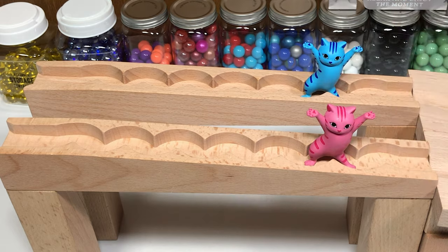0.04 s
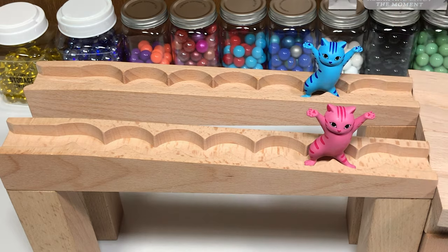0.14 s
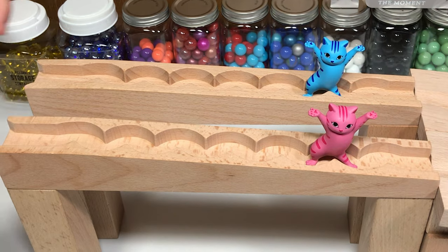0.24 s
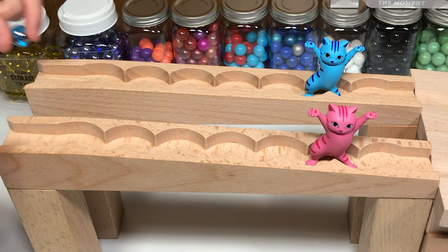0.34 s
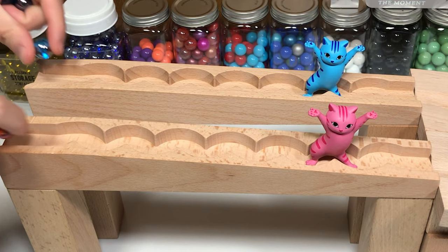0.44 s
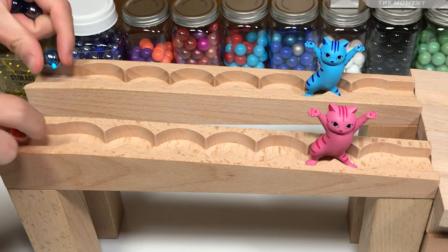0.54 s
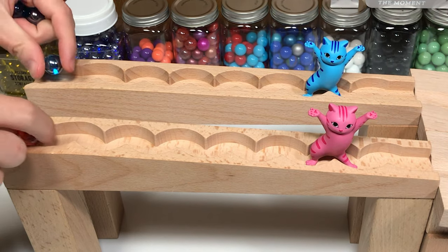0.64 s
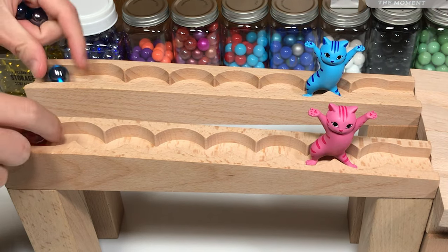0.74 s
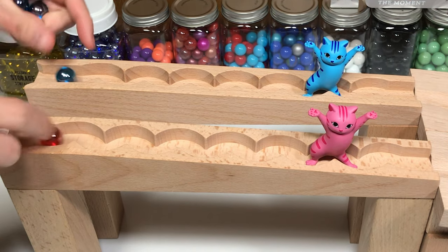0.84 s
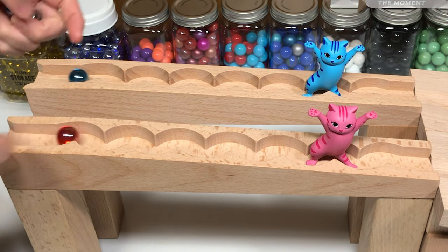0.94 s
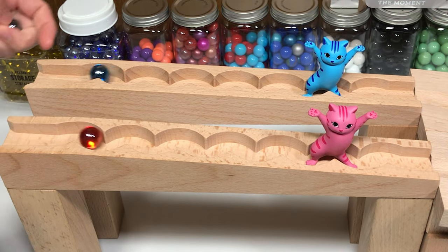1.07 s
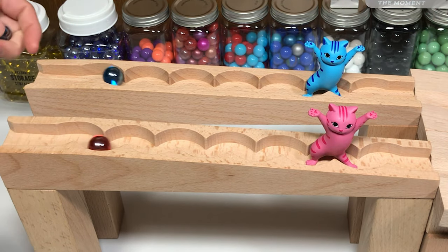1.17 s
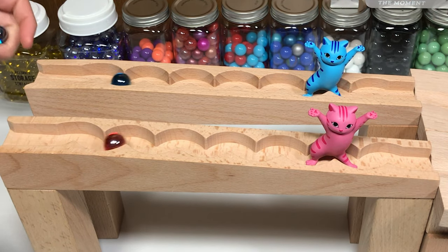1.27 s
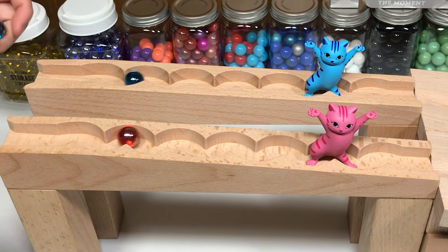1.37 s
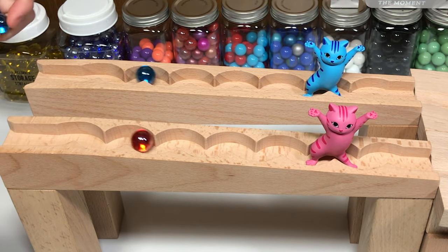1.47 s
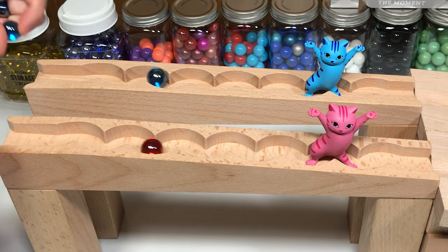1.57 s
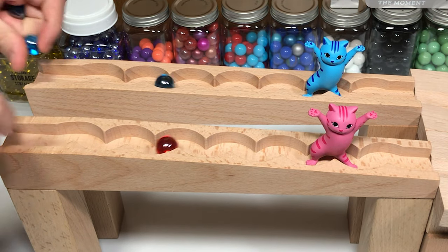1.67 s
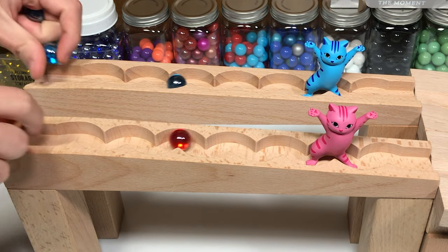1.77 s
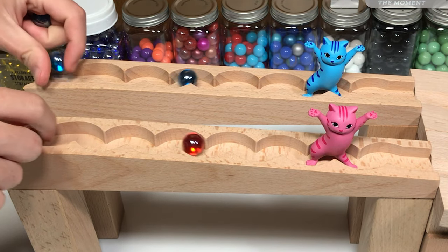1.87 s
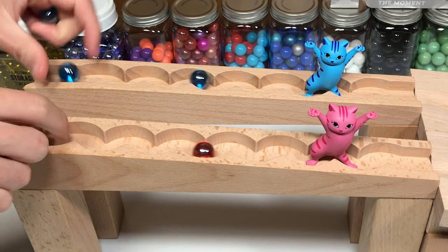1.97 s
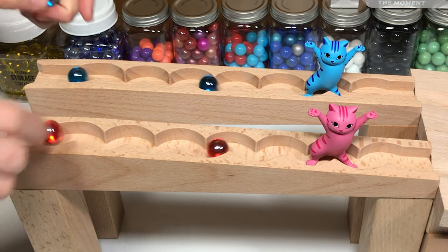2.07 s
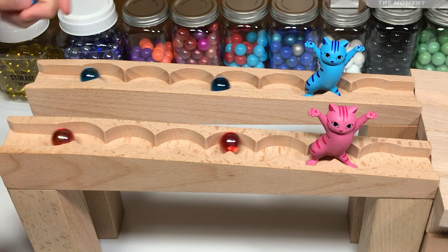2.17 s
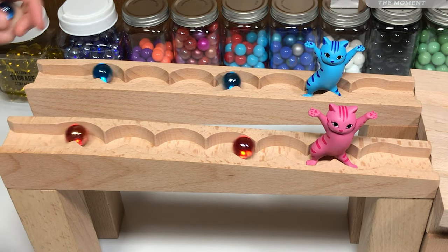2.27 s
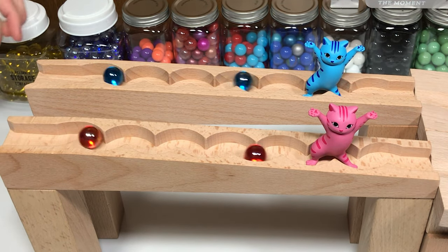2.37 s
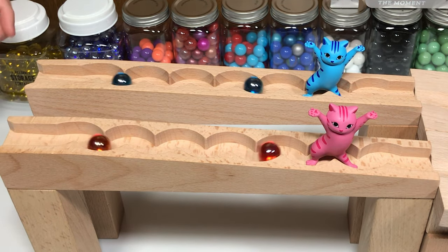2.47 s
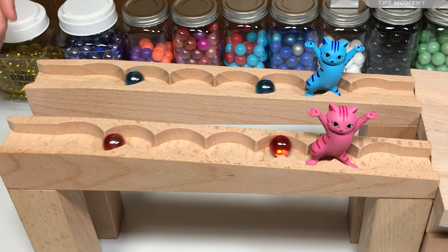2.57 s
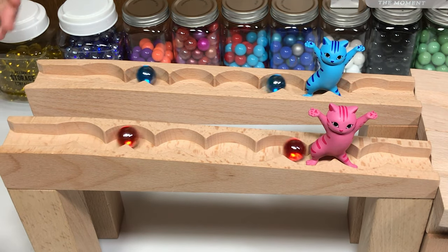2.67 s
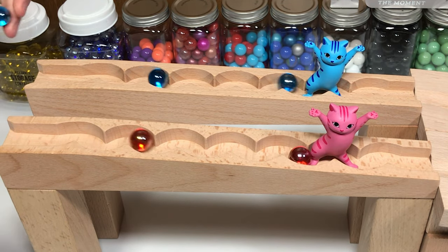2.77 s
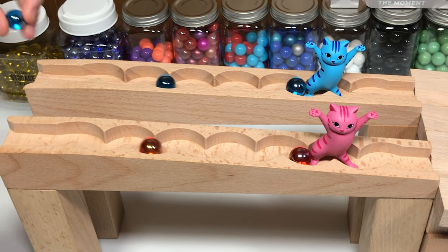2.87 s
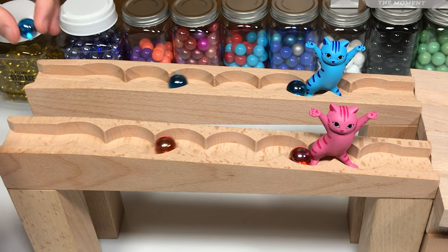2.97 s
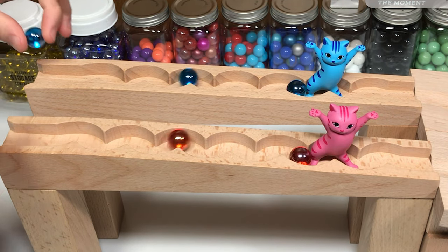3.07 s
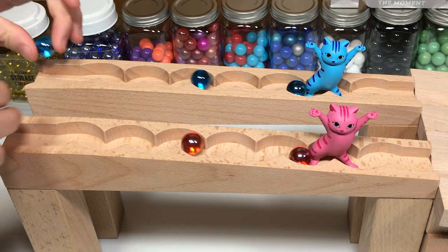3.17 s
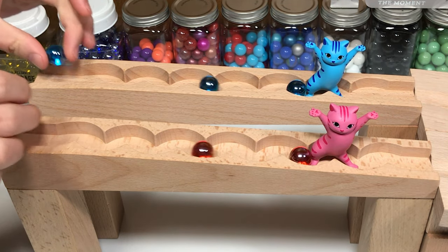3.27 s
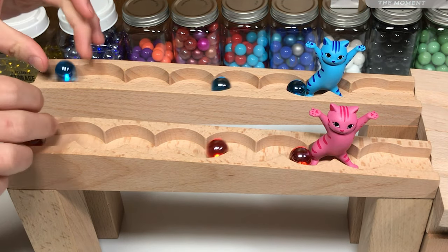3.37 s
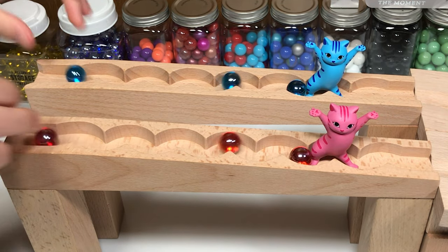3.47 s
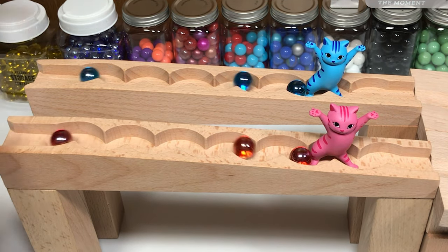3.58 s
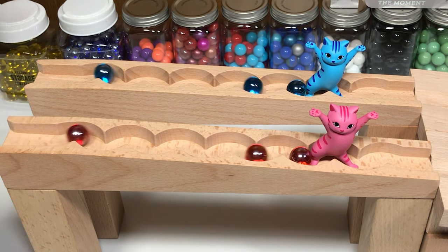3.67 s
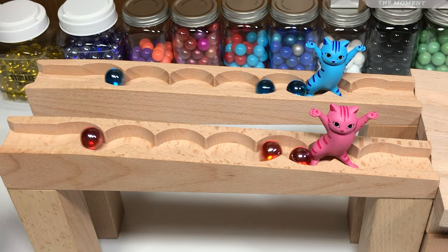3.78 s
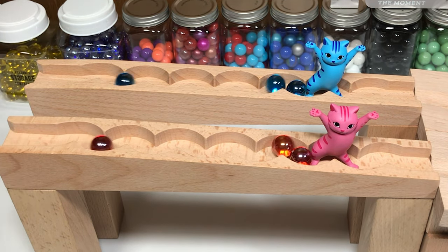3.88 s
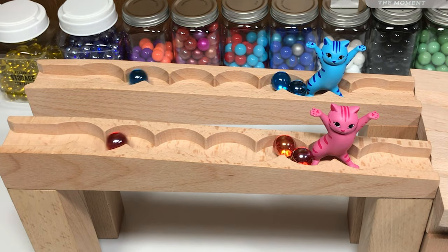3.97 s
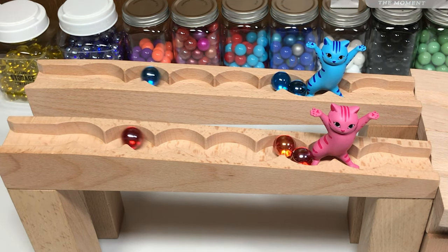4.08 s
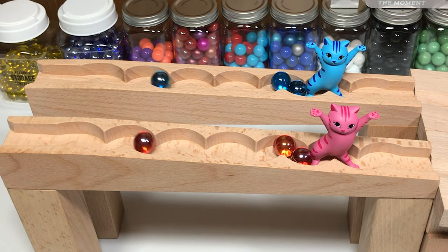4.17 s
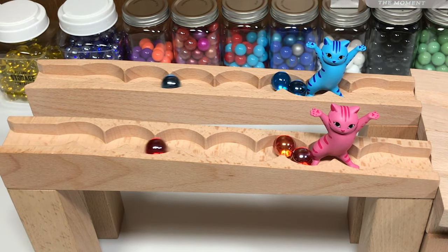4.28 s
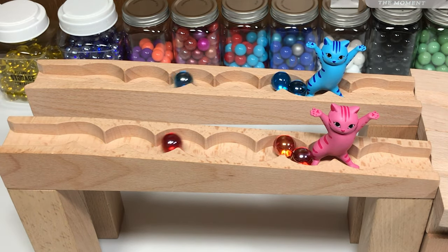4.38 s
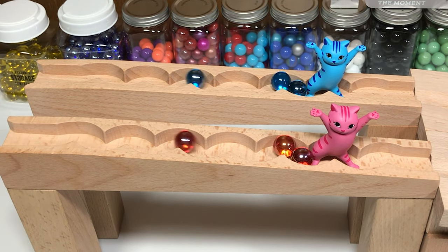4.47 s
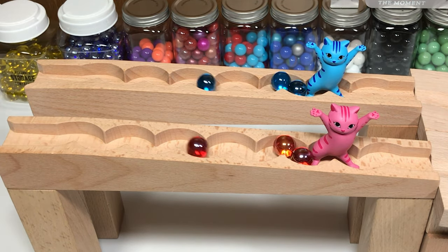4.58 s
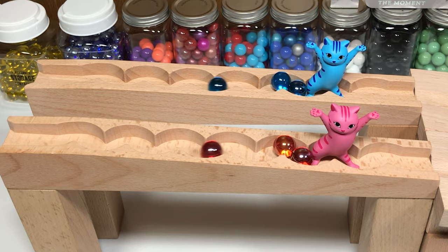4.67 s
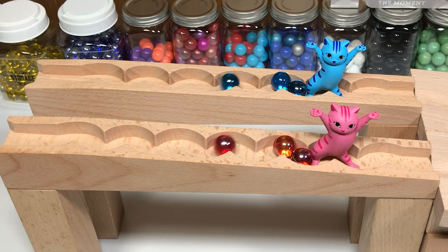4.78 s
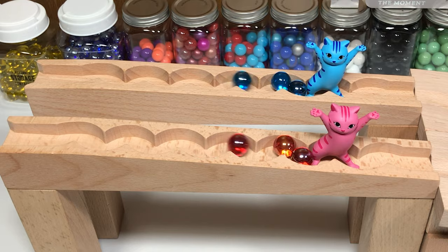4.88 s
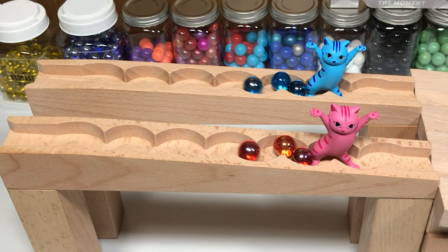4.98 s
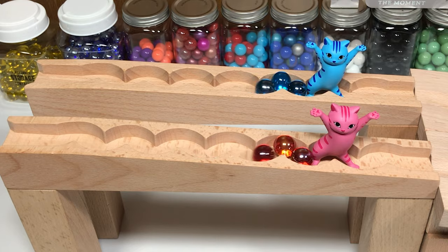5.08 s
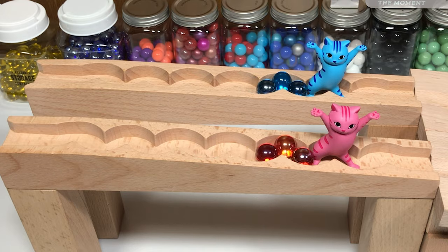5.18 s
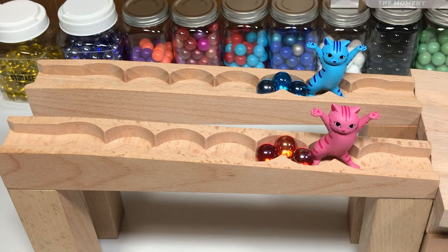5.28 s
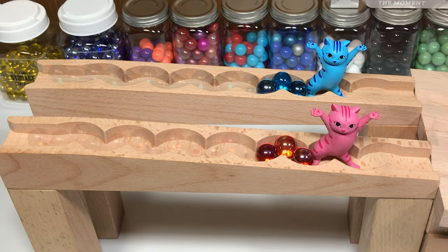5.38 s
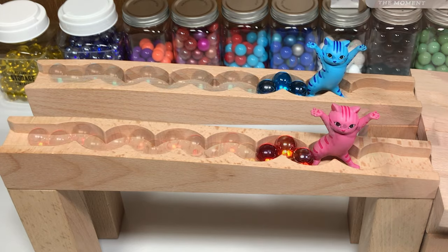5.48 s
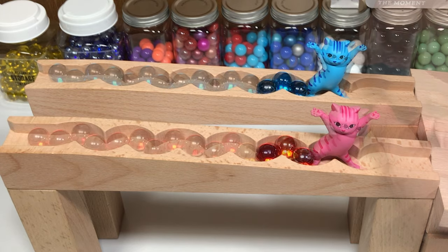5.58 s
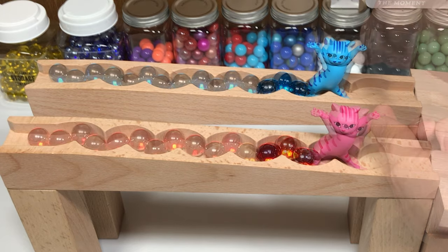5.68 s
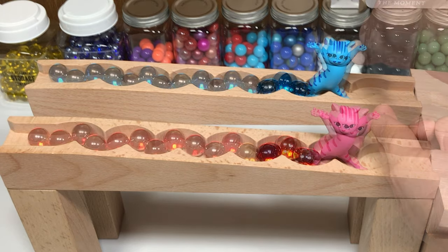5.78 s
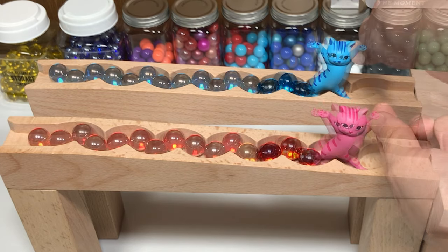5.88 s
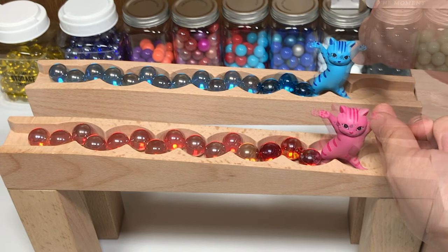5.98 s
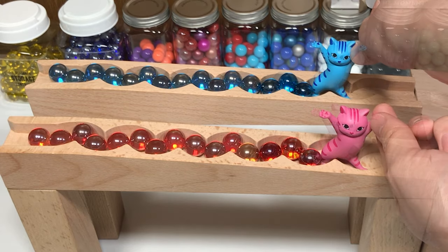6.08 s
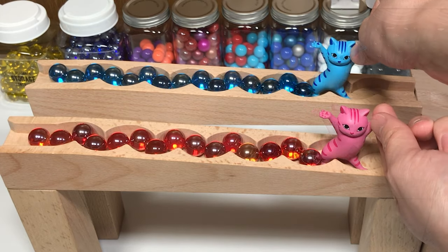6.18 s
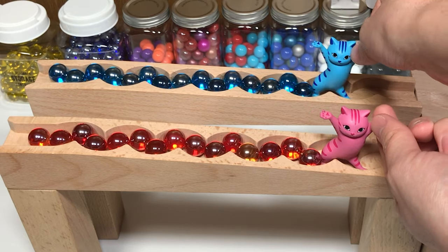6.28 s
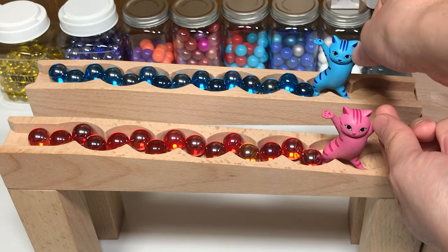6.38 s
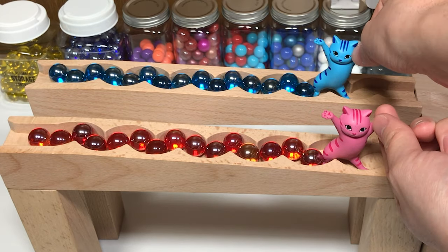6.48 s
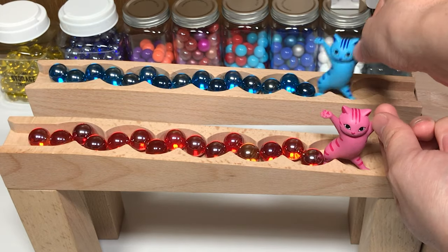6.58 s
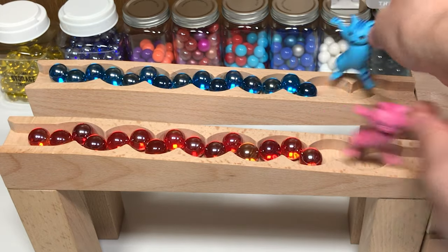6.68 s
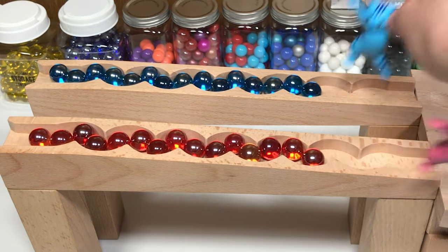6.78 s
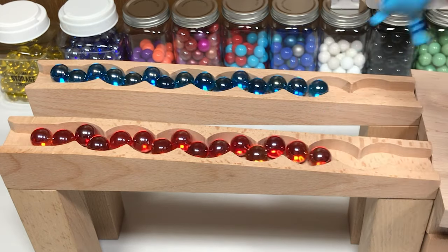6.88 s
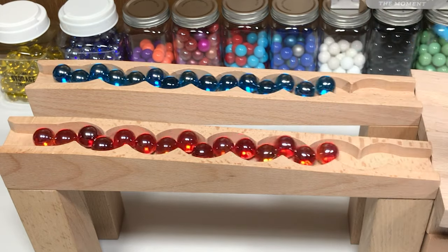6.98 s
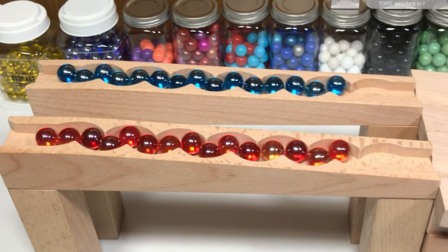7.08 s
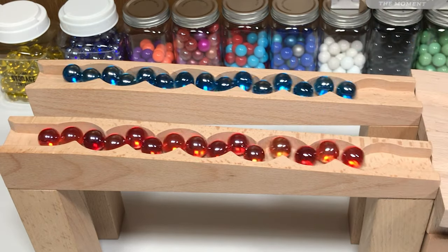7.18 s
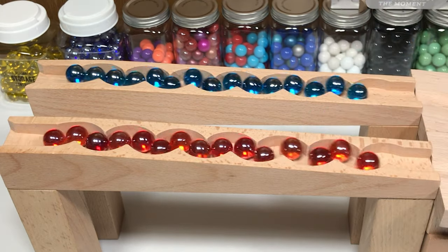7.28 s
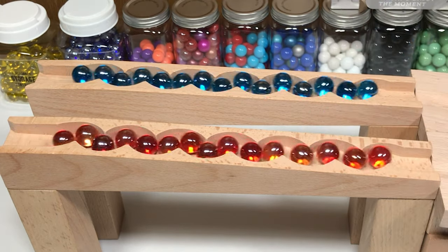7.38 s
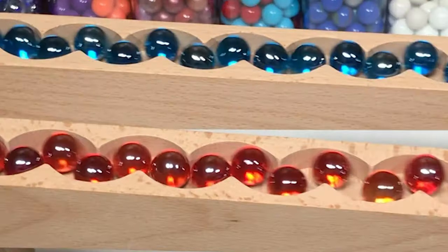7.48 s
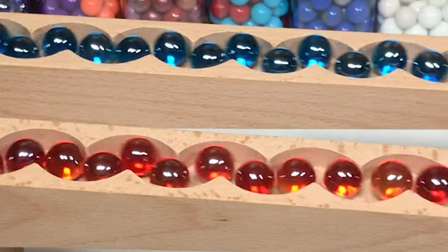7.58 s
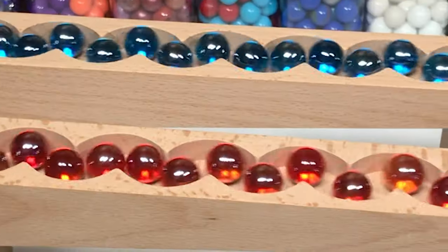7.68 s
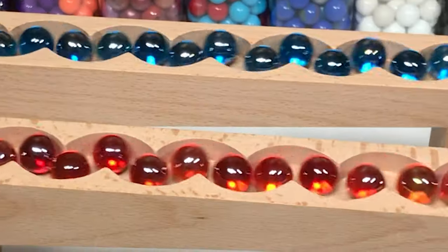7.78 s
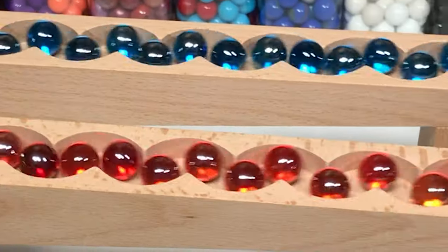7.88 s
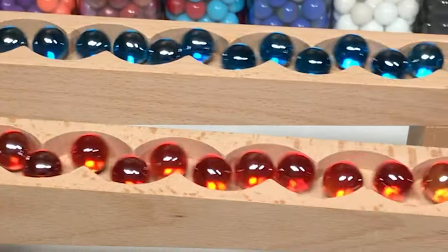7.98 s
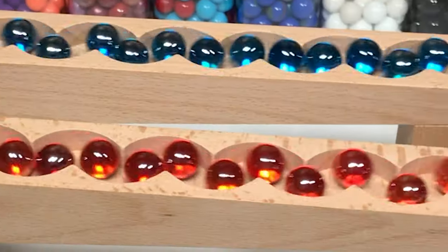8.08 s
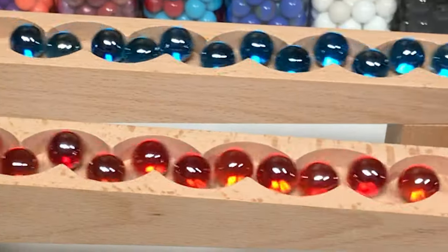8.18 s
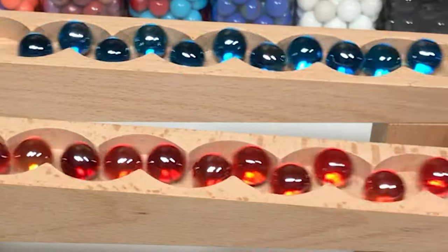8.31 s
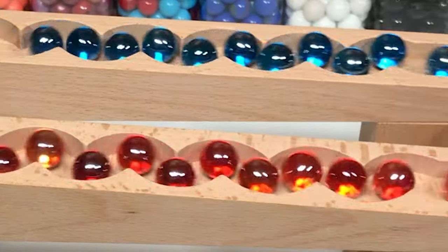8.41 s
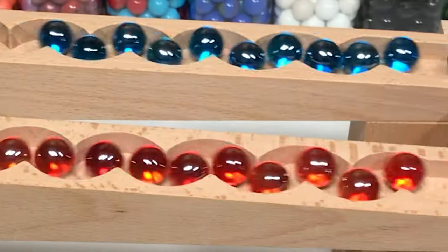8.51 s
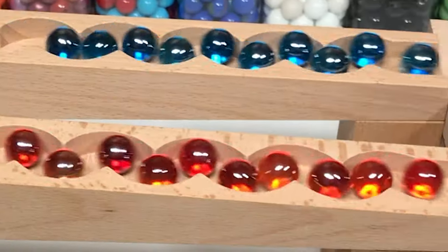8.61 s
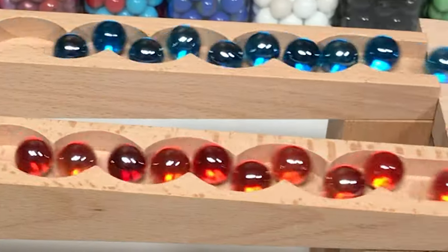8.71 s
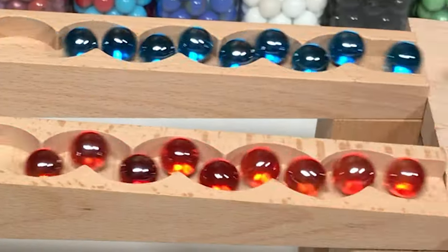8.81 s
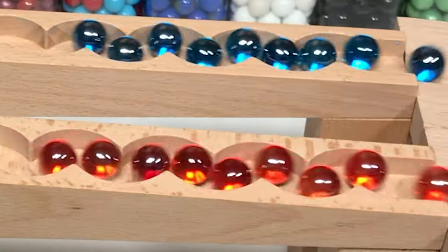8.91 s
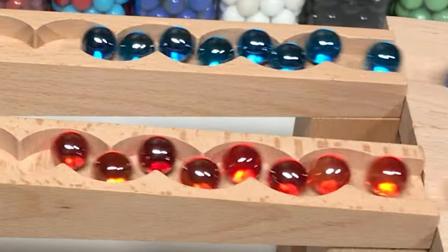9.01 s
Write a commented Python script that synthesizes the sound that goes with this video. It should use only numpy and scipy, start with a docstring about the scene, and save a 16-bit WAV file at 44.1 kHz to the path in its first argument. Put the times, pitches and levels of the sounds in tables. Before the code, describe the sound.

Dry, close sound of marbles on wood, with slight room reverberation and low hum. Three pairs are set down one after another, each landing in a fast fading bounce, then making regular woody ticks as they wobble down scalloped tracks. Short glass snaps mark their stops. A quiet gap follows, then one firm knock, and two long rows start moving with dense, uneven clatter and swelling rumble.

```python
"""Over a low hum in a small reverberant room, soft bumps precede pairs of glass marbles set on two wooden tracks.
Each marble lands in a bouncing series of modal knocks, rumbles down a ramp as shaped noise, and ticks from hollow
to hollow. Glass clacks are short noise bursts, first against the marbles that wait behind two toy figures. The
figures are then lifted away with a knock and a stick-slip scrape, and two full rows rumble and rattle downhill."""
import sys
import numpy as np
from scipy import signal
from scipy.fft import rfft, irfft, next_fast_len
from scipy.io import wavfile
from scipy.ndimage import map_coordinates

SR = 44100
rng = np.random.default_rng(int(sys.argv[2]) if len(sys.argv) > 2 else 0)


def pcm_store(signal):
    """Save signal as 16-bit PCM."""
    levels = np.round(np.clip(np.atleast_2d(signal), -1, 1) * 32767)
    wavfile.write(sys.argv[1], SR, levels.astype(np.int16).T)


N = 399105
TOP_HZ = 15950  # upper band limit


def amp(db):
    """Level law: decibels to amplitude ratio."""
    return 10 ** (np.asarray(db) / 20)


def unit(x):
    """Normalisation to unit root-mean-square."""
    return x / np.sqrt(np.mean(x ** 2) + 1e-20)


def along(points, hz):
    """Interpolation of (frequency [Hz], value) points on a logarithmic frequency axis."""
    f, v = np.transpose(points)
    return np.interp(np.log(hz + 1), np.log(f + 1), v)


def noise(spectrum, shape):
    """Spectral shaping: white noise weighted in the frequency domain, at unit rms."""
    size = next_fast_len(shape[-1])
    white = rfft(rng.standard_normal((*shape[:-1], size)))
    gain = amp(along(spectrum, np.fft.rfftfreq(size, 1 / SR)))
    return unit(irfft(white * gain, size)[..., :shape[-1]])


def wobble(rate):
    """Slow random modulation: a spline through random knots, rate of them a second."""
    knots = rng.standard_normal(int(N * rate / SR) + 4)
    return map_coordinates(knots, [np.arange(N) * rate / SR])


def place(times, db, sounds):
    """Superposition: each sound is added at its time [s] and gain [dB]."""
    out = np.zeros(N + SR)
    for s, gain, sound in zip(times, amp(db), sounds):
        out[round(s * SR):][:len(sound)] += gain * sound
    return out[:N]


# spectrum of the room's steady low hum: (frequency [Hz], relative density [dB per Hz])
HUM_SPECTRUM = [(15, -50), (25, -25.5), (48, -6.5), (92, -5.5), (180, -21.5), (256, -22.5), (354, -18.5),
                (384, -24.5), (624, -29), (734, -31), (1480, -38.5), (5730, -45), (10700, -47.5),
                (14800, -46.5), (16000, -41.5)]


def hum(level_db):
    """Stationary background: coloured noise of constant level."""
    return amp(level_db) * noise(HUM_SPECTRUM, (N,))


# fingers and toy figures against marbles and wood: (time [s], relative level [dB])
BUMP_EVENTS = [(0.678, -49), (2.902, -43.5), (6.396, -45.5), (6.466, -55), (6.619, -43.5), (6.722, -21),
               (6.752, -28), (6.772, -33), (6.785, -34.5)]
# spectrum of the dull blow: (frequency [Hz], relative density [dB per Hz])
BUMP_SPECTRUM = [(60, -7), (190, 2.5), (400, -12.5), (700, 1.5), (1000, 2.5), (1300, -7.5), (1800, 0.5),
                 (3000, -2.5), (3700, -8.5), (4600, 2.5), (5400, -31), (9000, -25), (16000, -59)]


def bumps(level_db, t60, tail_db, tail_t60, ring_db, ring_hz, ring_t60, cut_hz, hardening):
    """Soft impact: a two-stage noise decay and one blurred resonance, low-passed by contact duration."""
    s, db = np.transpose(BUMP_EVENTS)
    t = np.arange(SR // 3) / SR
    decay = amp(-60 * t / t60) + amp(tail_db - 60 * t / tail_t60)
    blow = noise(BUMP_SPECTRUM, (len(s), len(t))) * decay
    ring_band = [(.8 * ring_hz, -45), (ring_hz, 0), (1.27 * ring_hz, -45)]
    ring = noise(ring_band, blow.shape) * amp(ring_db - 60 * t / ring_t60)
    # a lighter touch has a longer contact, hence a lower cutoff
    cuts = np.minimum(cut_hz * amp(hardening * (db - db.max())), TOP_HZ)
    dulled = [signal.lfilter(*signal.butter(2, cut, fs=SR), x) for cut, x in zip(cuts, blow + ring)]
    return place(s, db + level_db, dulled)


# spectrum of rolling over the wood's grain: (frequency [Hz], relative density [dB per Hz])
RUMBLE_SPECTRUM = [(50, -25.5), (110, -8), (200, 4), (450, 10.5), (700, 3.5), (1000, 2.5), (1750, -6),
                   (2200, -22.5), (3000, -5), (4500, -29), (9000, -40.5), (16000, -45)]
# a pair of marbles starts down the tracks: time [s]
PAIR_STARTS = [0.75, 1.99, 3.42]
RAMP_S, RUN_S = 0.17, 1.89  # time to the foot of the entry ramp, and to the end of the hollows
ROWS_START_S = 6.95  # the full rows start to move


def rolling(ramp_db, ramp_width_s, hollows_db, rows_db, rows_growth, bumps_db):
    """Rolling excitation: grain rumble swells on the ramp, murmurs in the hollows and grows with the rows."""
    t = np.arange(N) / SR
    age = t - np.array(PAIR_STARTS)[:, None]
    ramp = amp(ramp_db) * np.exp(-((age - RAMP_S) / ramp_width_s) ** 2)
    fade = np.clip(np.minimum(age, RUN_S - age) / RAMP_S, 0, 1)
    pairs = (ramp + amp(hollows_db)) * fade
    rows = amp(rows_db) * np.maximum(t - ROWS_START_S, 0) ** rows_growth
    level = np.sqrt(np.sum(pairs ** 2, axis=0) + rows ** 2)  # independent sources add in power
    return level * unit(noise(RUMBLE_SPECTRUM, (N,)) * amp(bumps_db * wobble(110)))


SPLIT_HZ = 4500  # crossover between body and bright edge


def strikes(count, modes, grain, grain_t60, ring_db, crack_db, tinkle_db, tinkle_t60, detune, blur_hz, rise):
    """Modal impact on wood, as (body, bright edge), each at unit deviation over its first 10 ms."""
    t = np.arange(SR // 4) / SR
    crack = amp(crack_db - 60 * t / 0.0078)
    blows = noise(grain, (count, len(t))) * (amp(-60 * t / grain_t60) + crack)
    # every spot on the track favours one high resonance
    tinkle_hz = 5700 * 1.65 ** (rng.random((count, 1)) ** 2)
    blows += amp(tinkle_db - 60 * t / tinkle_t60) * np.sin(2 * np.pi * tinkle_hz * t)
    # each mode is a cluster of close ones, so its phase wanders
    steps = rng.standard_normal(blows.shape)
    wander = np.cumsum(steps, axis=1) * np.sqrt(2 * np.pi * blur_hz / SR)
    for hz, db, t60 in modes:
        # the spot that is hit sets the strength and sign of each mode; the marbles' weight shifts its pitch
        strength, sign, shift = rng.standard_normal((3, count, 1))
        phase = 2 * np.pi * hz * (1 + detune * shift) * t + rng.permutation(wander)
        gain = np.sign(sign) * amp(ring_db + db + 2.87 * strength)
        blows += gain * amp(-60 * t / t60) * np.sin(phase.astype(np.float32))
    blows *= 1 - np.exp(-t / rise)  # the blow takes a moment to spread through the plank
    filters = [signal.butter(4, SPLIT_HZ, side, fs=SR, output="sos") for side in ("low", "high")]
    parts = [signal.sosfilt(sos, blows) for sos in filters]
    parts[1] = parts[1] * (amp(-60 * t / 0.079) + 0.29)  # wood damps its treble fastest
    return [p / p[:, :SR // 100].std(axis=1, keepdims=True) for p in parts]


def pings(s, db, hz, t60):
    """Single-mode resonance: a clear, high decaying sine that only some spots of the wood give."""
    t = np.arange(SR // 5) / SR
    pitch = hz * (1 + 0.0044 * rng.standard_normal((len(s), 1)))
    envelope = amp(-60 * t / t60) * (1 - np.exp(-t / 0.00076))
    return place(s, db, np.sin(2 * np.pi * pitch * t) * envelope)


# a marble lands on the end of a track: (time [s], relative level [dB], first flight [s],
# share of speed kept at a bounce [ratio], bright edge re landing [dB], ping re landing [dB])
LANDINGS = [(0.779, -16, .049, 0.58, -24, -24), (0.798, -16.5, .063, .71, -8, -21),
            (1.902, -19, .026, 0.51, -24, -30), (1.9775, -16.5, .0663, .68, -10, -26),
            (2.0928, -14.5, .063, 0.62, -22, -24), (3.4103, -14, .0766, 0.78, -10.5, -19),
            (3.4186, -12, .07, 0.67, -17, -26), (8.002, -23, .008, .68, -5, -4),
            (8.371, -21.5, .008, .45, -12.5, -24), (8.5657, -23.5, .008, 0.5, -13, -22),
            (8.741, -23, .006, 0.73, -10, -5)]
# modes of the track's end, over the legs: (frequency [Hz], relative level [dB], decay time T60 [s])
END_RESONANCES = [(1391, 4, 0.053), (1460, -5.5, 0.1), (1838, -2, .06), (2160, -4, 0.049), (2620, 2, .06),
                  (2810, -2, 0.2), (2866, -14, 0.56), (3180, -10.5, .08), (4530, -1, 0.045),
                  (4670, -15.5, 0.15), (5630, -2.5, 0.032)]
# dense, short-lived modes of the end: (frequency [Hz], relative density [dB per Hz])
END_SPECTRUM = [(50, -4.5), (150, 1.5), (550, -11.5), (1000, -2.5), (1500, 0.5), (3000, 3.5), (3800, -8),
                (5800, -12), (6800, -19), (9300, -27), (11000, -48), (15000, -32)]
# spectrum of the track's shaking on its legs: (frequency [Hz], relative density [dB per Hz])
SHAKE_SPECTRUM = [(45, -11.5), (80, 11.5), (140, -5), (300, 6.5), (550, 0.5), (1000, -2), (1400, -4),
                  (2800, -1), (3700, -13.5), (5500, -21), (9000, -34.5)]
BOUNCE_LOSS = 1.435  # exponent: a bounce's strength goes with this power of its speed


def knocks(body_db, edge_db, ping_db, shake_db, shake_t60, chatter_db, count=7):
    """Inelastic bouncing: restitution makes impacts faster and weaker; the track chatters on its loose legs."""
    start, peak, flight, kept, edge, ping = np.transpose(LANDINGS)[..., None]
    kept, k = np.clip(kept, .1, .9), np.arange(count)
    # flight times form a geometric series
    s = (start + flight * (1 - kept ** k) / (1 - kept)).ravel()
    db = (peak + BOUNCE_LOSS * 20 * np.log10(kept ** k)).ravel()
    edge, ping = np.repeat(edge, count), np.repeat(ping, count)
    body, bright = strikes(len(s), END_RESONANCES, END_SPECTRUM, grain_t60=0.035, ring_db=-5.5, crack_db=6.5,
                           tinkle_db=-10.0, tinkle_t60=0.02, detune=0.011, blur_hz=34.3, rise=.0006)
    t = np.arange(SR // 2) / SR
    shake_envelope = amp(-60 * t / shake_t60) * (1 - np.exp(-t / 0.0013))
    shake = noise(SHAKE_SPECTRUM, (len(s), len(t))) * shake_envelope
    chatter = place(s, db + shake_db, shake) * unit(amp(chatter_db * np.tanh(wobble(150))))
    wood = place(s, db + body_db, body) + place(s, db + edge + edge_db, bright)
    return wood + pings(s, db + ping + ping_db, hz=5370, t60=.05) + chatter


# a rolling marble meets the wall of a hollow: (time [s], relative level [dB], bright edge re tick [dB])
WALL_TICKS = [(1.0796, -32, -5.5), (1.1526, -34.5, -5.5), (1.2251, -30.5, -12), (1.3296, -33.5, -2),
              (1.4303, -32, -4), (1.524, -35, -2.5), (1.6305, -30, -17), (1.7439, -33.5, -2),
              (1.8285, -29, -9), (1.9608, -33, -9), (2.0303, -27.5, -8.5), (2.1223, -27.5, -3),
              (2.2291, -25, -7), (2.3242, -34, 0), (2.3635, -33, -6), (2.377, -30.5, -9),
              (2.4304, -26, -12), (2.539, -29, -3.5), (2.577, -28.5, -5.5), (2.625, -27.5, -11.5),
              (2.7393, -29.5, -8.5), (2.782, -27, -15), (2.829, -30.5, -17), (2.9356, -26, -10),
              (3.1362, -24, -11), (3.1457, -32, -12), (3.2228, -33.5, -20), (3.3272, -25, -16.5),
              (3.357, -28.5, -10.5), (3.718, -23, -10.5), (3.7564, -35, -5), (3.7721, -27, -11.5),
              (3.8946, -33, -1), (3.911, -24, -18), (4.0909, -32, 0), (4.1101, -28.5, -8),
              (4.1859, -36, -8), (4.2898, -33, -3), (4.3097, -26, -15), (4.4809, -25.5, -11),
              (4.493, -31.5, -12), (4.577, -32, -23), (4.6816, -27, -8.5), (4.7012, -27, -23),
              (4.8703, -25.5, -18), (4.883, -28, -9), (5.0781, -30, -5.5), (5.084, -26, -28),
              (5.1327, -34, -24), (5.1469, -30, -30), (6.992, -38, -0.5), (7.0287, -33.5, -8),
              (7.075, -29.5, -2), (7.2316, -32, -17), (7.2568, -30.5, -2), (7.2834, -32, 0.5),
              (7.4805, -23.5, -17), (7.5833, -29.5, -25), (7.659, -24, -6), (7.8184, -23.5, -31),
              (7.8814, -25, -7.5), (8.115, -23, -9), (8.2688, -22.5, -10), (8.4254, -22.5, -9),
              (8.5332, -24, -11), (8.6183, -24, -12), (8.6447, -22, -11.5), (8.832, -25, -8),
              (8.949, -24.5, -13), (8.9934, -22.5, -17)]
# modes of the track struck along its hollows: (frequency [Hz], relative level [dB], decay time T60 [s])
TRACK_RESONANCES = [(1412, -8, 0.084), (1734, 6.5, 0.038), (1820, -12, 0.23), (2325, -8, 0.022),
                    (2814, -2, 0.08), (3334, 0, 0.029), (3415, -11.5, 0.35), (3990, -17, .04),
                    (4380, -20, 0.043), (5864, -15, 0.038), (6250, -2, 0.032), (7460, -6, .04),
                    (9120, -8.5, 0.027)]
# dense, short-lived modes of the track: (frequency [Hz], relative density [dB per Hz])
TRACK_SPECTRUM = [(100, -16.5), (400, -7), (900, -5), (1700, 1), (3500, 0.5), (6300, -8), (9300, -10.5),
                  (10800, -19.5), (16000, -25.5)]
# ticks on the few spots of the wood that ring high and clear: (time [s], ring level [dB])
CLEAR_SPOTS = [(1.0795, -34), (1.153, -40.5), (1.4306, -35.5), (2.3635, -35), (3.7564, -38), (4.0909, -36)]
# the swing back to the other wall: later [s], weaker [dB], duller [dB]
REBOUND_S, REBOUND_DB, REBOUND_EDGE_DB = .078, -12.5, -9
REBOUND_SCATTER_S = .004  # no two swings take quite the same time


def ticks(body_db, edge_db):
    """Oscillation in a hollow: each wall impact is followed by a weaker rebound half a swing later."""
    rebounds = np.add(WALL_TICKS, [REBOUND_S, REBOUND_DB, REBOUND_EDGE_DB])
    rebounds[:, 0] += REBOUND_SCATTER_S * rng.standard_normal(len(WALL_TICKS))
    s, db, edge = np.concatenate([WALL_TICKS, rebounds]).T
    body, bright = strikes(len(s), TRACK_RESONANCES, TRACK_SPECTRUM, grain_t60=0.046, ring_db=-1, crack_db=5.5,
                           tinkle_db=-2, tinkle_t60=0.029, detune=0.014, blur_hz=49.96, rise=0.00038)
    wood = place(s, db + body_db, body) + place(s, db + edge + edge_db, bright)
    return wood + pings(*np.transpose(CLEAR_SPOTS), hz=5390, t60=0.038)


# glass meets glass: (time [s], relative level [dB])
GLASS_CONTACTS = [(3.9203, -18.5), (3.9374, -28), (3.956, -29), (3.9804, -19.5), (5.1319, -20.5),
                  (5.147, -22), (6.5015, -44), (6.6521, -39), (7.1236, -26.5), (7.227, -28)]
# spectrum of the snap: (frequency [Hz], relative density [dB per Hz])
GLASS_SPECTRUM = [(600, -12.5), (1800, 11.5), (3500, -6), (7000, 5), (10000, -2.5), (12500, -9),
                  (16000, -28)]


def clacks(level_db, t60):
    """Hard-body collision: glass on glass gives a very short, bright noise burst."""
    s, db = np.transpose(GLASS_CONTACTS)
    t = np.arange(SR // 20) / SR
    return place(s, db + level_db, noise(GLASS_SPECTRUM, (len(s), len(t))) * amp(-60 * t / t60))


def scrape(start, end, level_db, grit_db):
    """Stick-slip friction: a figure is pulled out past the first marble, catching and slipping."""
    stroke = np.interp(np.arange(N) / SR, [start, start + 0.014, end], [0, 1, 0])
    slips = unit(amp(grit_db * np.tanh(wobble(250))))
    # (frequency [Hz], relative density [dB per Hz])
    rasp = noise([(900, -5), (1500, 3), (2500, -5), (4500, -9), (6000, 5.5), (9000, -3.0), (15000, -19)], (N,))
    return amp(level_db) * stroke * slips * rasp


ROWS_SPEEDUP_S = 1  # time constant of the rows' gathering speed


def clatter(body_db, edge_db, spread_db, dulling_db_per_s, count=320):
    """Stochastic impacts: many uneven contacts, louder with speed and duller as the rows spread out."""
    age = (N / SR - ROWS_START_S) * (np.arange(count) + rng.random(count)) / count
    speed_db = 20 * np.log10(1 - np.exp(-age / ROWS_SPEEDUP_S))
    force, hardness = spread_db * np.clip(rng.standard_normal((2, count)), -2, 1.5)
    body, bright = strikes(count, TRACK_RESONANCES, TRACK_SPECTRUM, grain_t60=0.037, ring_db=-8.5, crack_db=-6,
                           tinkle_db=0.5, tinkle_t60=0.026, detune=0.0336, blur_hz=50, rise=0.00025)
    s, db = ROWS_START_S + age, speed_db + force
    edge = hardness / 2 + edge_db - dulling_db_per_s * age
    return place(s, db + body_db, body) + place(s, db + edge, bright)


# reverberation of the small room: (frequency [Hz], decay time T60 [s])
ROOM_DECAY = [(150, 0.92), (1000, 0.67), (3000, 0.29), (7000, 0.3), (14000, 0.32)]


def room(x):
    """Reverberation: convolution with two decaying noise tails whose blend varies with excitation time."""
    blend = np.pi * np.arange(N) / SR / .45
    out = np.zeros(N)
    for share in (np.cos(blend), np.sin(blend)):
        hz, t, z = signal.stft(rng.standard_normal(SR // 2), SR, nperseg=256)
        decay = amp(-60 * t / along(ROOM_DECAY, hz)[:, None])
        tail = signal.istft(z * decay, SR, nperseg=256)[1]
        tail = np.pad(tail / np.linalg.norm(tail), (SR // 200, 0))  # 5 ms before the first reflection
        out += signal.fftconvolve(x * share, tail)[:N]
    return out


def scene():
    """Linear superposition: contacts and their reverberation, rolling and hum."""
    hits = bumps(level_db=-4.5, t60=0.024, tail_db=-17.0, tail_t60=0.16, ring_db=-13.0, ring_hz=2910,
                 ring_t60=0.27, cut_hz=7300, hardening=0.51)
    hits += knocks(body_db=-13.5, edge_db=-11.0, ping_db=-5, shake_db=-26, shake_t60=0.26, chatter_db=6.5)
    hits += ticks(body_db=-15.0, edge_db=-12)
    hits += clacks(level_db=-11.5, t60=0.018)
    hits += scrape(start=6.633, end=6.70, level_db=-48.5, grit_db=8)
    hits += clatter(body_db=-46.5, edge_db=-45.5, spread_db=7.0, dulling_db_per_s=7.0)
    roll = rolling(ramp_db=-52.5, ramp_width_s=.08, hollows_db=-69, rows_db=-55.0, rows_growth=1.67, bumps_db=1.5)
    return (hits + amp(-12.0) * room(hits) + roll + hum(level_db=-61.5))[None]


def record(dry):
    """Band limitation: a small microphone loses the deepest bass, and a steep filter cuts above TOP_HZ."""
    thin = signal.sosfilt(signal.butter(2, 38, "high", fs=SR, output="sos"), dry)
    return signal.sosfilt(signal.ellip(10, .1, 70, TOP_HZ, fs=SR, output="sos"), thin)


dry = scene()
out = record(dry)
pcm_store(out)
```